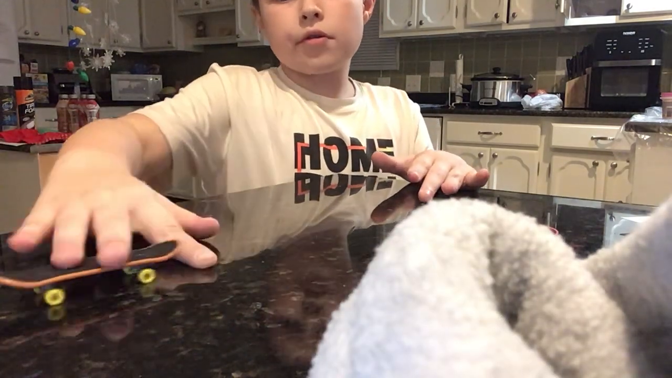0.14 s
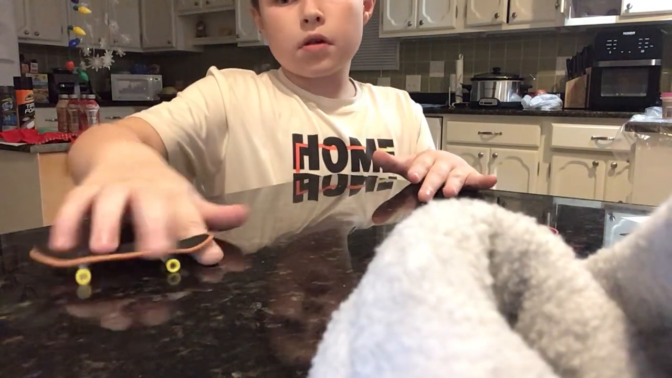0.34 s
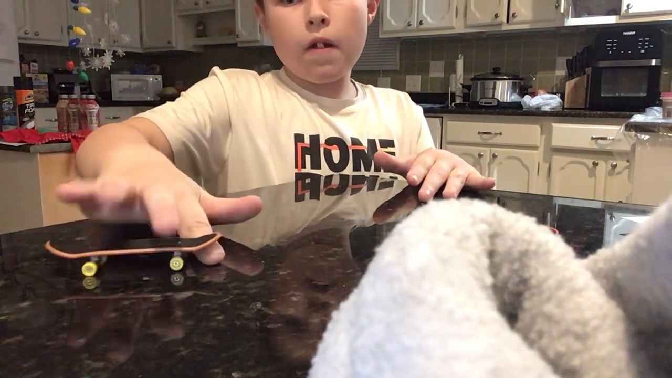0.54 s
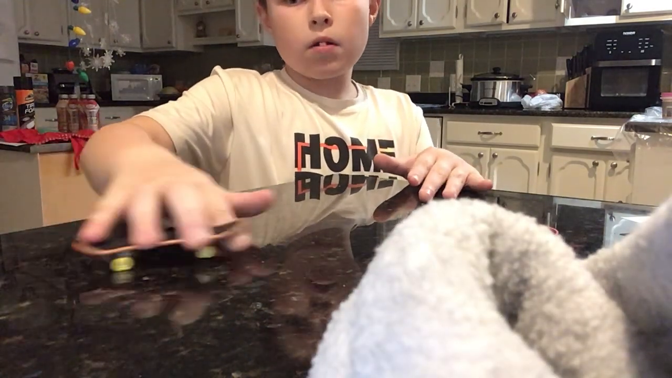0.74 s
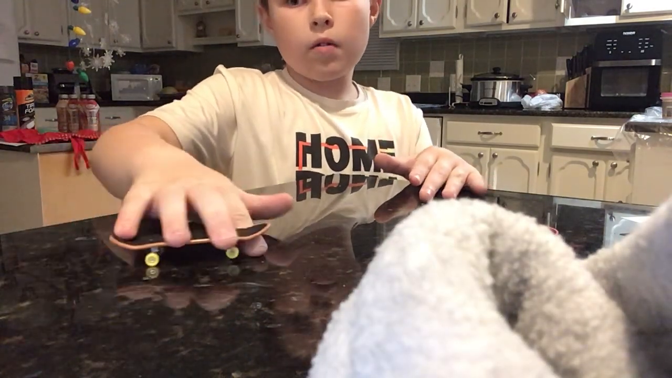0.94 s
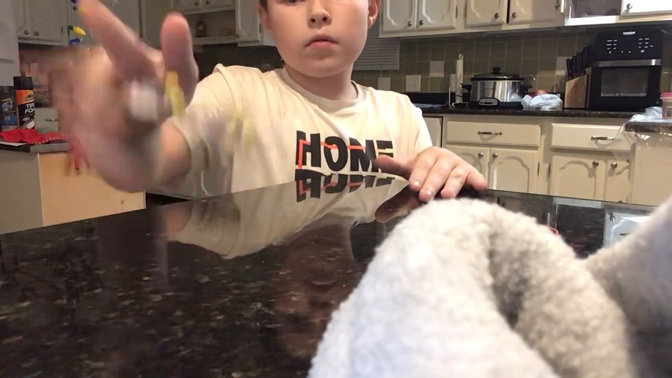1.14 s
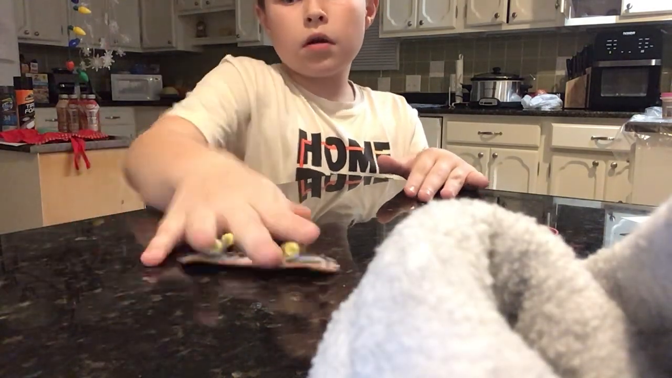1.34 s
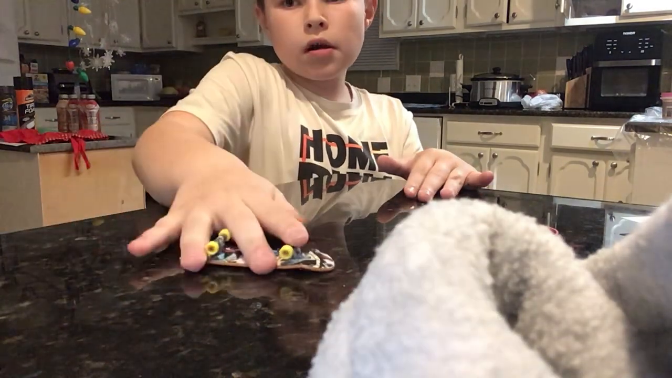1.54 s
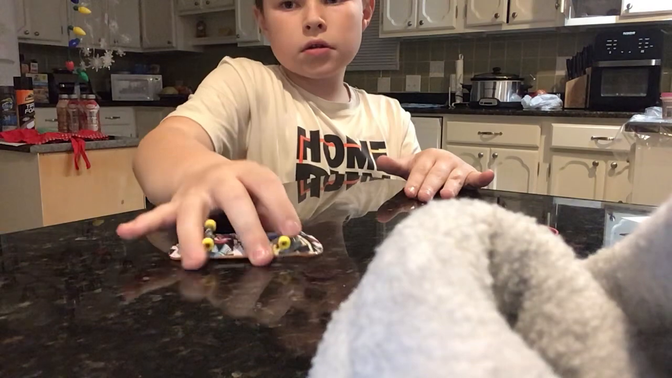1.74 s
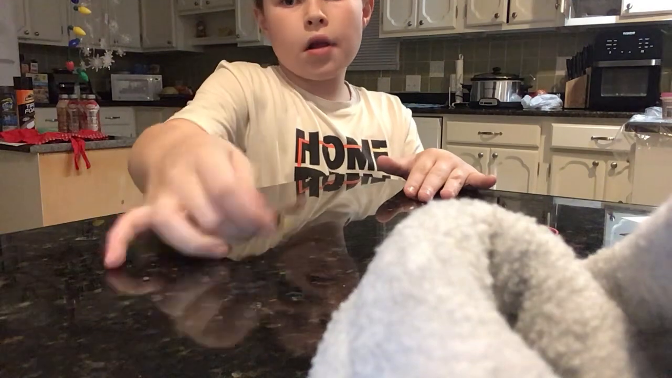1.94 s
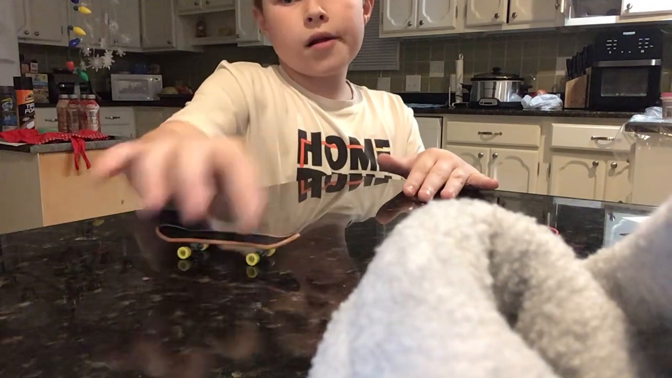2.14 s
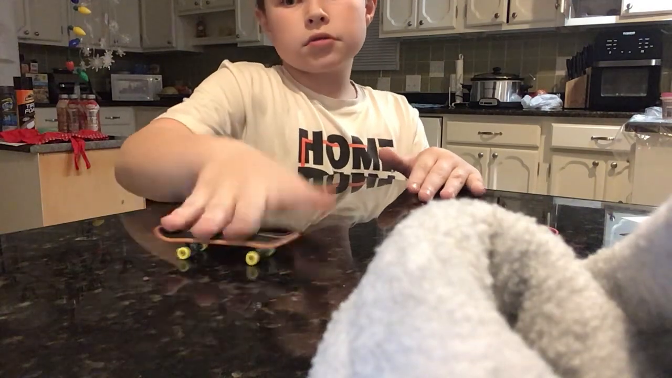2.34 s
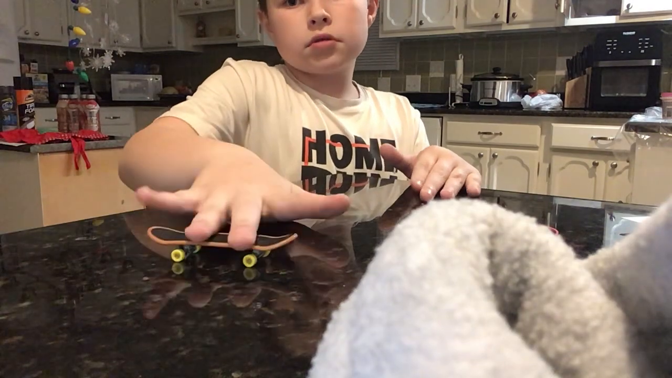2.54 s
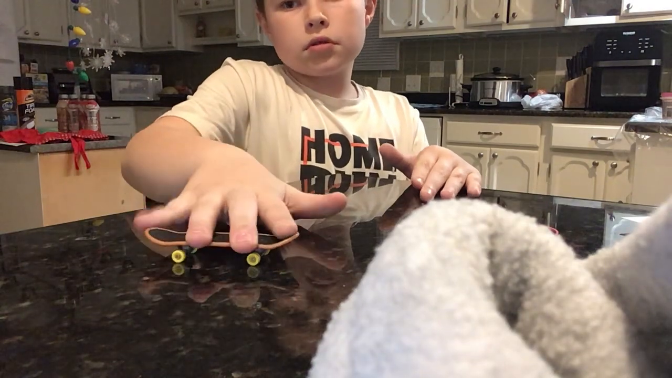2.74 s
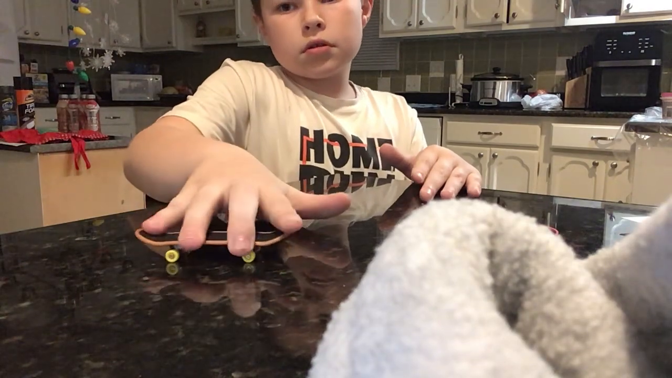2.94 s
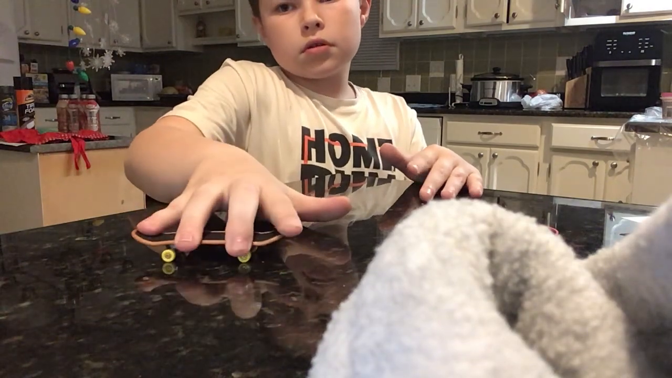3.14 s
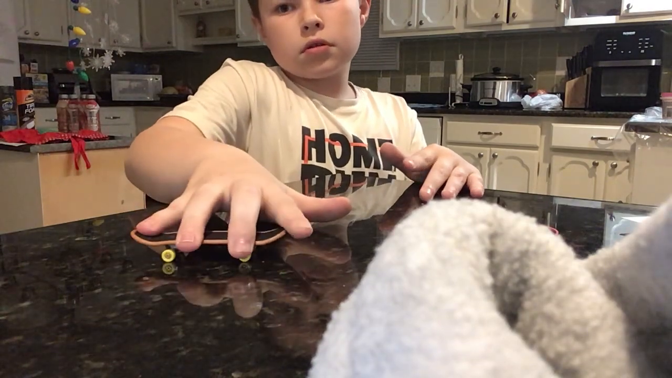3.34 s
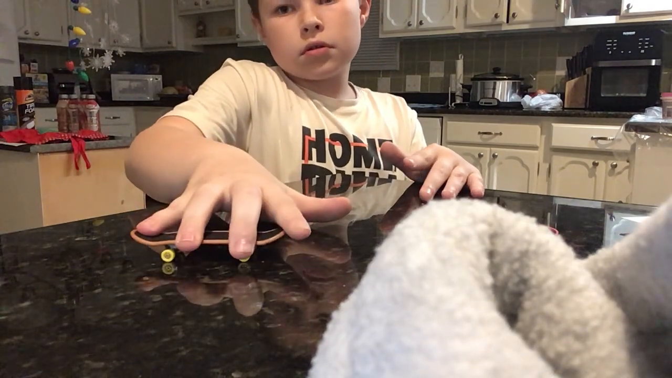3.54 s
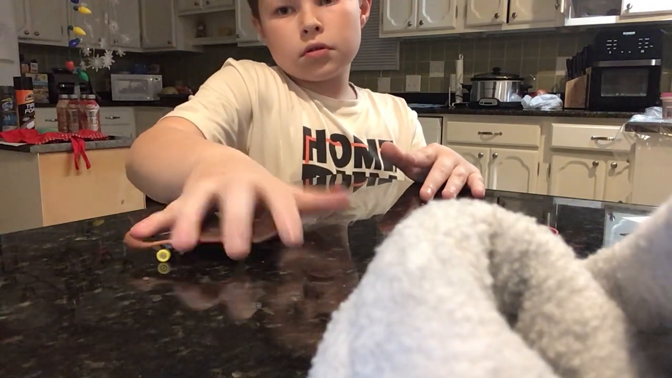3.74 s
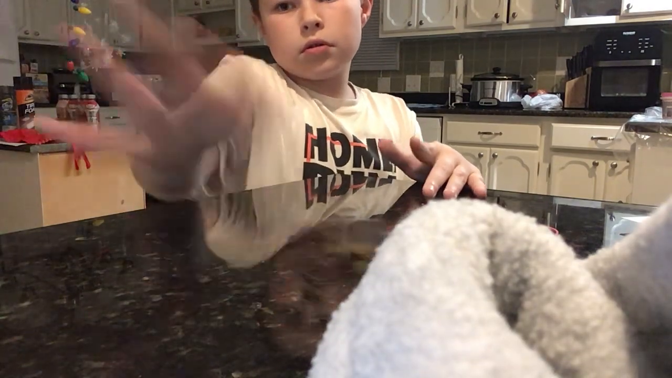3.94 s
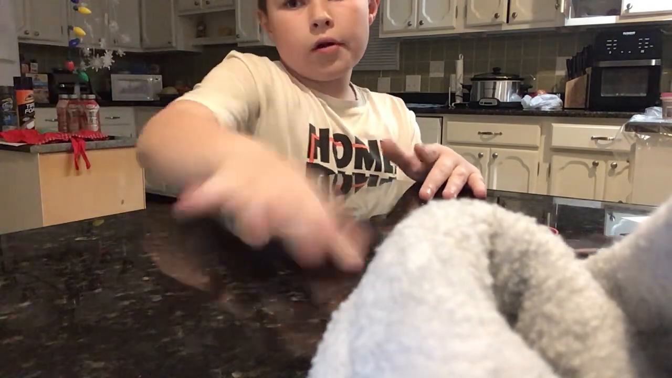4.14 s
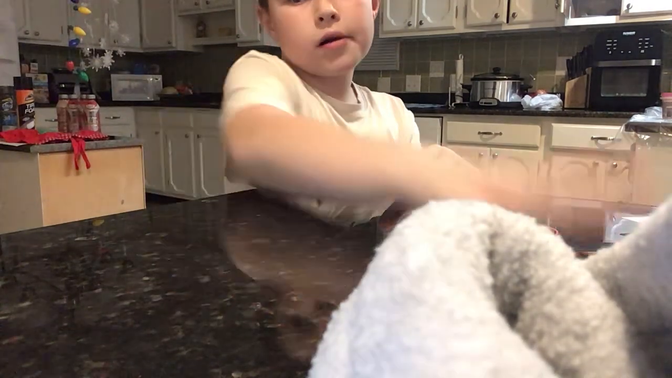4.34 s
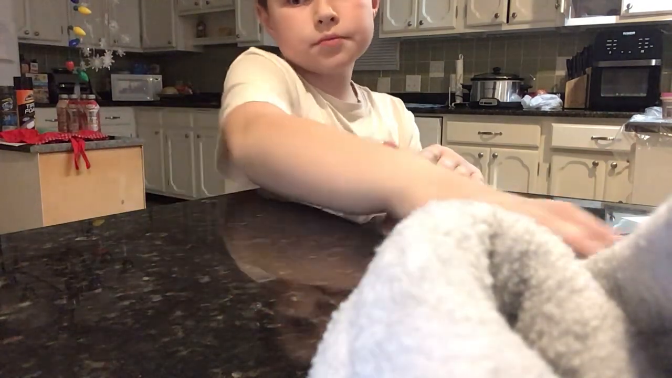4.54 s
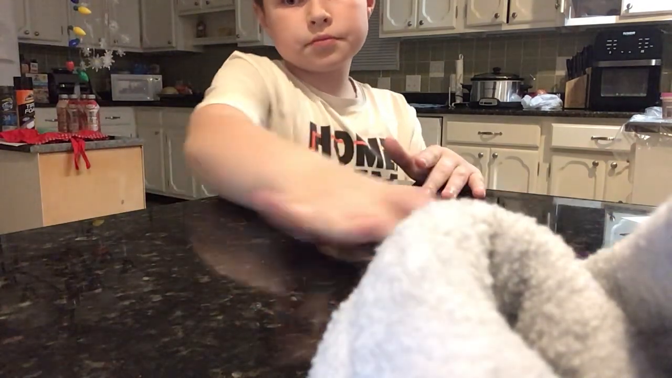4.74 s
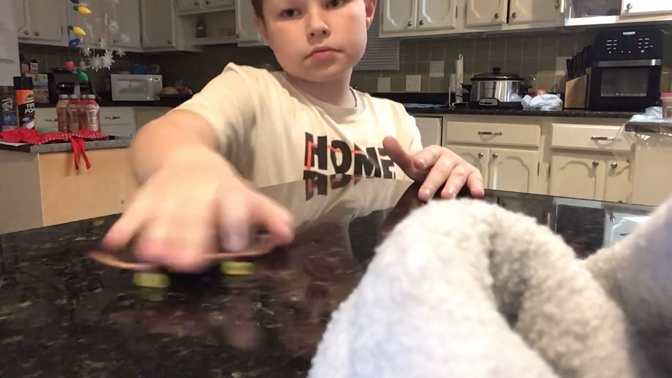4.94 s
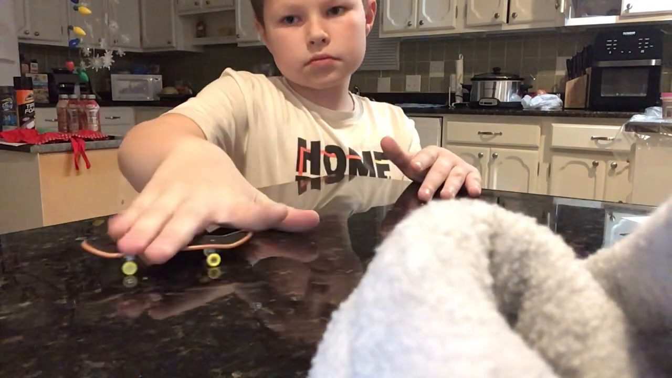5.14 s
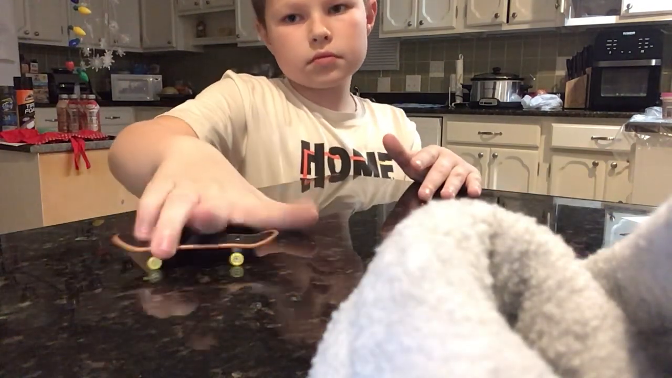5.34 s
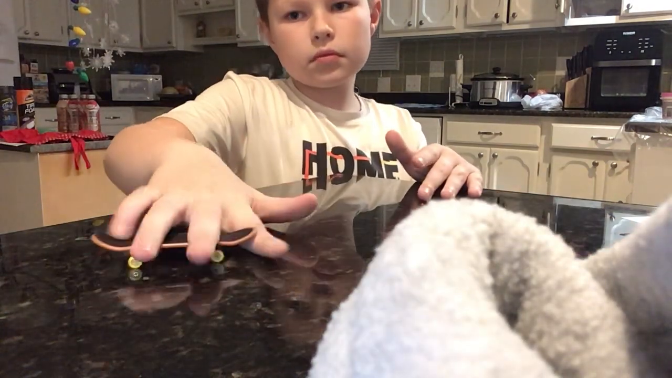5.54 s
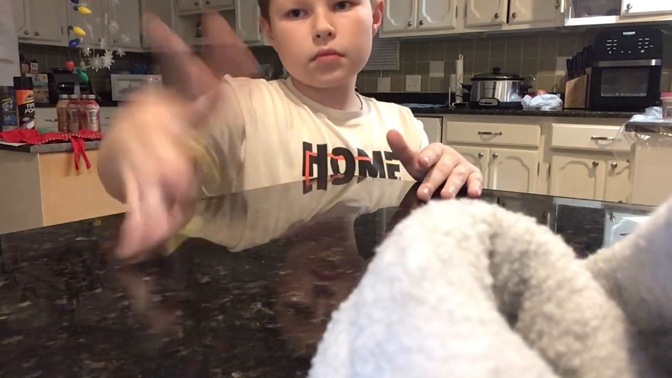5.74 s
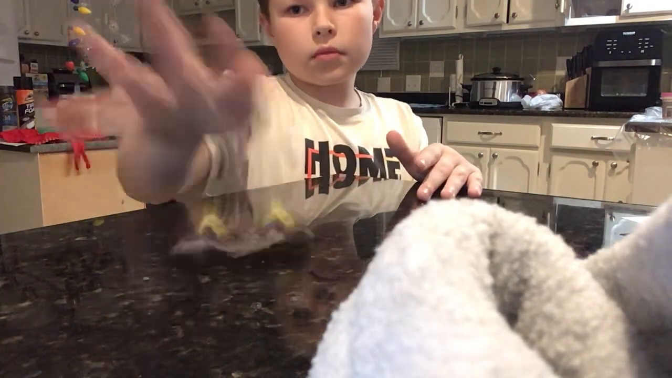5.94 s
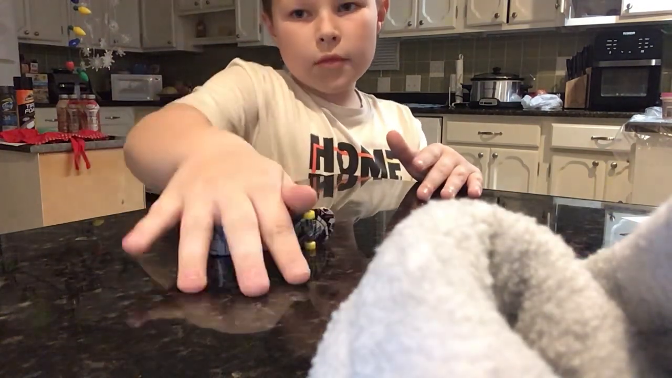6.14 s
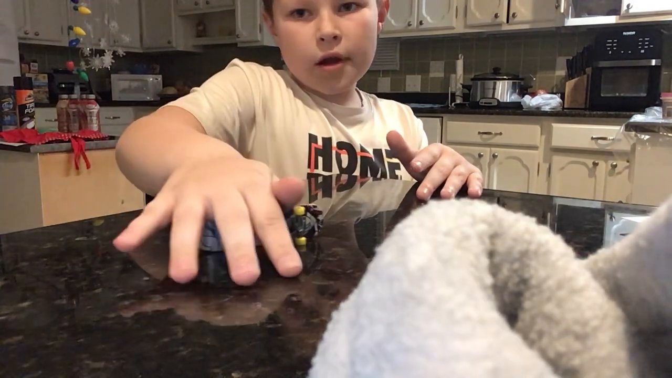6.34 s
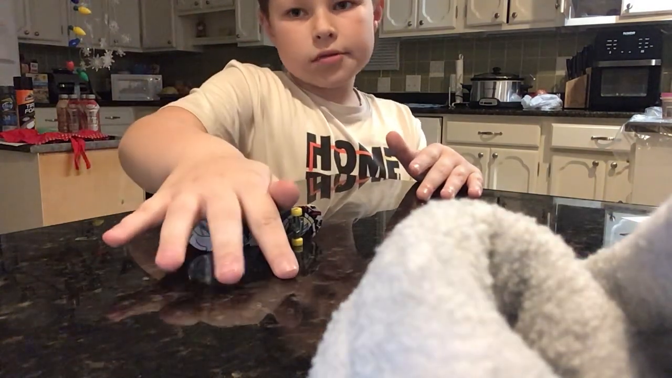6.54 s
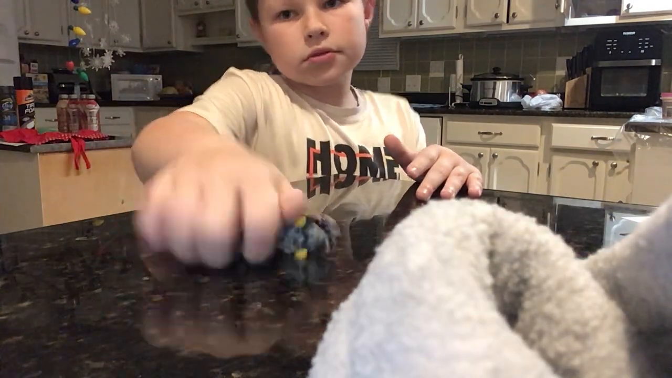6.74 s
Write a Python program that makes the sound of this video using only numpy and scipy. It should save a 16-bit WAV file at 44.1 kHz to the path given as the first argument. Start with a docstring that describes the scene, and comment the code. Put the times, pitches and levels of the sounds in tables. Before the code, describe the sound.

In a reflective kitchen, a toy board ticks and slides on polished stone over a faint low fridge hum. A bright crack with a deep counter knock comes early, then light rattles and a pause. A heavy palm thump and a second slap follow, with the forearm rubbing over the counter, more clicks, a piercing close board drop and a final slap. Finger squeaks and faint taps end it.

```python
"""On a stone kitchen counter, close to the microphone, a toy fingerboard is pushed, popped and dropped.
Bursts of tiny impulses ring deck, trucks and wheels; slaps of a hand are short puffs of filtered noise.
Slab and hollow cabinet are heard as thuds that fall in pitch; slides and squeaks are filtered slips.
The hard kitchen adds an echo and a diffuse tail after every hit, while a refrigerator hums in the room's air."""
import sys
import numpy as np
from scipy import signal
from scipy.fft import rfft, irfft, next_fast_len
from scipy.io import wavfile
from scipy.ndimage import uniform_filter1d, minimum_filter1d

SR = 44100
rng = np.random.default_rng(int(sys.argv[2]) if len(sys.argv) > 2 else 0)


def wrap_up_sound(samples):
    """Save the sound to the file named by the first command line argument, as 16-bit audio."""
    columns = np.atleast_2d(samples).T
    # keep every value between -1 and 1, then stretch to whole-number steps
    tamed = np.clip(columns, -1, 1)
    steps = np.round(tamed * 32767).astype(np.int16)
    wavfile.write(sys.argv[1], SR, steps)


N = 298993
TIME = np.arange(N) / SR


def from_db(db):
    """Decibels to gain."""
    return 10 ** (np.asarray(db) / 20)


def rms_one(x):
    """Scale to an rms of 1."""
    return x / np.sqrt(np.mean(x ** 2) + 1e-20)


def unit_blow(x):
    """Scale to the energy of a hundredth of a second at rms 1."""
    return x / np.sqrt(np.sum(x ** 2) * 100 / SR + 1e-20)


def at_hz(points, hz, axis=1):
    """Read a column of a table on a log-frequency axis."""
    table = np.array(points)
    return np.interp(np.log(np.maximum(hz, 1)), np.log(table[:, 0]), table[:, axis])


def band(x, hz, kind, order=2):
    """Causal Butterworth filter."""
    sections = signal.butter(order, np.minimum(hz, .45 * SR), kind, fs=SR, output="sos")
    return signal.sosfilt(sections, x)


def coloured(x, spectrum):
    """Give a steady sound a spectrum; rms 1."""
    size = next_fast_len(N)
    gain = from_db(at_hz(spectrum, np.fft.rfftfreq(size, 1 / SR)))
    return rms_one(irfft(rfft(x, size) * gain, size)[:N])


def drift(rate):
    """Smooth random wander with an rms of 1, aiming at a new value `rate` times a second."""
    knots = rng.standard_normal(int(N / SR * rate) + 4)
    return rms_one(np.interp(TIME * rate, np.arange(len(knots)), knots))


def add(track, s, sound):
    """Mix a sound into a track at time s."""
    start = int(s * SR)
    track[start:start + len(sound)] += sound[:max(N - start, 0)]


def ring(force, modes, vary_db, detune, size=4096):
    """Modes driven by a force; each blow finds them with other strengths and slightly shifted pitches."""
    force = np.pad(force, (0, size - len(force))) + 1e-18
    out = 0
    for (hz, db, t60), (strength, shift) in zip(modes, rng.standard_normal((len(modes), 2))):
        radius = from_db(-60 / (t60 * SR))
        angle = 2 * np.pi * hz * (1 + detune * shift) / SR
        mode = signal.lfilter([1, 0, -1], [1, -2 * radius * np.cos(angle), radius * radius], force)
        # subtracting the sum so far alternates the signs of the modes
        out = from_db(db + vary_db * strength) * mode - out
    return unit_blow(out)


def chatter(length_s, first=1.8, size=1024):
    """A hard first touch followed by a dying scatter of tiny ones."""
    touches = rng.standard_normal(size) * (rng.random(size) < .3)
    force = touches * np.exp(-np.arange(size) / (SR * length_s))
    force[0] += first
    return force


def sent_around(x, spread_s=.007, count=60):
    """Each contact takes its own paths into the room: every frequency leaves with another small delay."""
    hz = np.fft.rfftfreq(len(x), 1 / SR)
    delay_s = np.interp(hz, np.linspace(0, SR / 2, count), spread_s * rng.random(count))
    phase = 2 * np.pi * np.cumsum(delay_s) * hz[1]
    return irfft(rfft(x) * np.exp(-1j * phase), len(x))


BOARD_ROOM_DB = 0   # how strongly the board radiates into the room
# the drop inside this window lands near the microphone and is drier
CLOSE_FROM_S, CLOSE_UNTIL_S, CLOSE_ROOM_DB = 5.9, 6.02, -11


def room_share():
    """Gain into the room over time: constant but for the close drop."""
    close = (TIME > CLOSE_FROM_S) & (TIME < CLOSE_UNTIL_S)
    return from_db(np.where(close, CLOSE_ROOM_DB, BOARD_ROOM_DB))


# board touching stone or fingers: (time [s], chatter decay [s], deck level [dB], trucks level [dB],
# wheels level [dB], slab thud level [dB]); the thud is played by slab()
BOARD_CONTACTS = [(0.0982, 0.0011, -59.5, -59.5, -50, -55), (0.13, 0.0037, -52, -66, -52.5, -50.5),
                  (0.415, 0.002, -84, -70.5, -63, -67), (0.6196, 0.01, -58.5, -57.5, -48.5, -57),
                  (1.0491, 0.0026, -48.5, -47.5, -38, -51), (1.3054, 0.0014, -62, -66, -47, -82),
                  (1.3129, 0.003, -76, -56, -51, -85), (1.3342, 0.00082, -31.5, -21, -32.5, -51),
                  (1.3362, 0.00035, -34.5, -17, -14, -46), (1.829, 0.0026, -58.5, -59.5, -65, -58),
                  (1.8628, 0.004, -49, -46.5, -43, -50), (1.983, 0.002, -69.5, -62, -65, -77),
                  (2.012, 0.011, -55.5, -46.5, -53.5, -51), (2.0534, 0.007, -52.5, -52, -46.5, -45.5),
                  (2.351, 0.0078, -55.5, -60, -55, -50.5), (2.366, 0.0097, -45.5, -42, -37, -39),
                  (2.903, 0.0022, -69.5, -69, -57.5, -76), (3.8002, 0.0054, -44, -55, -39, -45.5),
                  (3.8798, 0.0042, -55.5, -63, -44.5, -68), (3.931, 0.0034, -39.5, -37, -35, -36),
                  (3.977, 0.0023, -67, -50, -44.5, -84), (4.692, 0.0024, -63, -73, -56.5, -54),
                  (4.744, 0.0013, -75, -61, -50.5, -47), (4.8086, 0.0022, -56.5, -55, -51, -65),
                  (4.895, 0.0034, -61, -51.5, -46, -59), (5.4837, 0.0066, -56, -59, -49, -64.5),
                  (5.683, 0.0011, -62, -68, -47.5, -66.5), (5.7327, 0.0017, -44.5, -46, -35.5, -49.5),
                  (5.9611, 0.00041, -30, -13, -12.5, -38), (5.9625, 0.00049, -29, -21, -10.5, -27.5),
                  (5.9914, 0.002, -31.5, -26, -26.5, -52), (6.67, 0.0018, -59, -64.5, -76.5, -75),
                  (6.753, 0.0013, -51, -51, -57.5, -53)]
# ringing parts of the board: (frequency [Hz], relative level [dB], t60 [s])
DECK_MODES = [(653, 0.5, 0.043), (1012.5, -5, 0.045), (1307, 1.5, 0.039), (1720, -3.5, .025),
              (2200, 1.5, 0.013), (2500, 3.5, 0.018)]
TRUCK_MODES = [(2870, -10.5, 0.033), (3580, -1.5, 0.012), (3995, 4.5, 0.015), (4480, -3, 0.0055),
               (4450, 2, 0.012), (4920, -6, 0.0082), (6090, 0, 0.0077)]
WHEEL_MODES = [(6650, -0.5, 0.0083), (7790, -1.5, 0.0084), (7440, -1, .008), (9335, -4.5, 0.004),
               (9960, -4, 0.016), (10420, 4, 0.0037), (12300, -2.5, 0.0035), (11760, 0, 0.0097),
               (14300, -7, 0.0022), (15130, -4.5, .004)]


def board(crack_db=-4.0, ring_share_db=-8.5, size=4096):
    """Each contact rings deck, trucks and wheels in its own proportion. Returns the sound straight ahead
    and the sound thrown into the room, where the peaks of all directions average out to a broad crack."""
    ahead, around = np.zeros((2, N))
    click = signal.unit_impulse(size)
    parts = [(DECK_MODES, [750, 2750]), (TRUCK_MODES, [2800, 6100]), (WHEEL_MODES, [6500, 12500])]
    # alternating signs let neighbouring bands join without a notch
    cracks = [(-1) ** k * unit_blow(band(click, edges_hz, "band")) for k, (_, edges_hz) in enumerate(parts)]
    for s, decay_s, deck_db, trucks_db, wheels_db, _ in BOARD_CONTACTS:
        force = chatter(decay_s)
        for (modes, edges_hz), crack, db in zip(parts, cracks, (deck_db, trucks_db, wheels_db)):
            rung = ring(force, modes, vary_db=1.5, detune=0.026)
            rung = unit_blow(band(rung, edges_hz, "band", order=1))
            cracked = unit_blow(signal.fftconvolve(force, crack)[:size])
            near = unit_blow(rung + from_db(crack_db) * cracked)
            far = unit_blow(crack + from_db(ring_share_db) * near)
            add(ahead, s, from_db(db) * near)
            add(around, s, from_db(db) * sent_around(far))
    return ahead, around * room_share()


# hand coming down on the counter: (time [s], puff decay [s], smack pitch [Hz], smack level [dB],
# sting level [dB], slab thud level [dB]); the thud is played by slab()
HAND_SLAPS = [(4.0228, 0.0015, 1250, -29.5, -37, -21), (4.3735, 0.0057, 1500, -47, -50, -46),
              (4.3805, 0.0067, 1593, -40, -35, -28), (6.031, 0.0028, 2086, -29.5, -39.5, -31.5)]


def hand(rise_s=0.0027, size=2048):
    """Skin meets stone over a few milliseconds: a hollow smack and a bright sting, with no ring."""
    out, t = np.zeros(N), np.arange(size) / SR
    for s, decay_s, hz, smack_db, sting_db, _ in HAND_SLAPS:
        puff = rng.standard_normal(size) * (1 - np.exp(-t / rise_s)) * np.exp(-t / decay_s)
        smack = band(puff, [hz / 1.83, hz * 1.68], "band")
        sting = band(band(puff, [2200, 7500], "band", order=1), 13600, "low")
        add(out, s, from_db(smack_db) * unit_blow(smack))
        add(out, s, from_db(sting_db) * unit_blow(sting))
    return out


# stone slab of the counter: (frequency [Hz], relative level [dB], t60 [s])
SLAB_MODES = [(231, -13.5, .05), (305, 0.5, 0.0074), (700, -6, 0.02)]


def slab():
    """Every board contact and hand slap knocks the slab's own short modes."""
    out = np.zeros(N)
    for row in BOARD_CONTACTS + HAND_SLAPS:
        s, thud_db = row[0], row[-1]
        thud = ring(np.ones(1), SLAB_MODES, vary_db=3.0, detune=0.018)
        add(out, s, from_db(thud_db) * unit_blow(band(thud, [170, 400], "band")))
    return out


# blows that shake the whole counter: (time [s], level [dB])
COUNTER_BOOMS = [(0.1176, -44), (1.331, -21), (1.8614, -51), (2.367, -47), (3.798, -47), (4.016, -16),
                 (4.38, -26.5), (5.105, -43), (6.026, -22.5)]
# hollow cabinet under the slab: (frequency [Hz], relative level [dB], t60 [s])
CABINET_MODES = [(76, 1.5, 0.17), (108.5, -11.5, .14), (166, -23, 0.026)]


def cabinet(swell_s=0.028, scatter_db=-8.0):
    """A heavy blow scatters in the slab at once, and the hollow cabinet below swells after it."""
    out, t = np.zeros(N), np.arange(8192) / SR
    for s, db in COUNTER_BOOMS:
        push = ring(np.ones(1), CABINET_MODES, vary_db=3.5, detune=0.01, size=16384)
        add(out, s + swell_s, from_db(db) * unit_blow(band(push, [55, 200], "band")))
        # waves thrown back from the edges of the slab make the knock uneven
        rebounds = rng.standard_normal(len(t)) * t * np.exp(-t / 0.019)
        add(out, s, from_db(db + scatter_db) * unit_blow(band(rebounds, [55, 260], "band")))
    return out


def counter(lag_s=.0062, corner_hz=330):
    """Slab and cabinet together; the lowest frequencies arrive a few milliseconds late, so each thud
    falls in pitch."""
    size = next_fast_len(N + SR)
    hz = np.fft.rfftfreq(size, 1 / SR)
    # delay of lag_s at the bottom, shrinking above the corner
    phase = lag_s * 2 * np.pi * corner_hz * np.arctan(hz / corner_hz)
    return irfft(rfft(slab() + cabinet(), size) * np.exp(-1j * phase), size)[:N]


def swell(s, length_s, attack_s, release_s):
    """Envelope that builds up to time s, holds for its length and dies away."""
    before, after = np.maximum(s - TIME, 0), np.maximum(TIME - s - length_s, 0)
    return np.exp(-(before / attack_s) ** 2 - after / release_s)


# pushes of the board or the arm across the stone: (time [s], length [s], rub level [dB],
# rasp level [dB], hiss level [dB]); levels come before the slide trim
SLIDE_STROKES = [(0.09, 0.054, -69, -66, -68), (0.284, 0.078, -75, -78, -69.5), (0.687, .14, -71, -74, -74),
                 (1.725, 0.13, -68, -63, -69), (2.398, 0.033, -74, -58.5, -71),
                 (3.86, 0.16, -55.5, -54, -56), (4.602, 0.14, -53.5, -67, -84),
                 (4.833, .11, -60, -57.5, -62), (5.028, 0.058, -79.5, -89, -64.5),
                 (5.336, .02, -76.5, -84.5, -68), (6.703, .09, -60, -64.5, -66.5)]
# friction colours, dark to bright: (frequency [Hz], relative level per Hz [dB])
RUB_COLOUR = [(450, -7.5), (650, 2), (870, -2), (1300, 0.5), (1850, -11), (2250, -2.5), (2600, -7),
              (3200, -21.5)]
RASP_COLOUR = [(2200, -20), (3100, 1), (3700, 1.5), (4450, 5), (5400, -13), (6500, -32), (9000, -29)]
HISS_COLOUR = [(4000, -34), (6000, -46), (7700, 3), (8800, -2), (10600, 6.5), (12500, 0), (14000, -8.5),
               (16000, -24)]
STROKE_ATTACK_S, STROKE_RELEASE_S = 0.052, 0.066   # time constants of the hand's speed
GRIT_PER_S, GRIT_DB = 69, 18   # crumbs caught under a stroke; level added, relative to a slip


def sliding(grain_db=3.5, uneven_db=3.0, slide_db=-2.5):
    """Friction is a dense stream of small slips under an uneven pressure, with a crumb of grit now and then."""
    grit = from_db(GRIT_DB) * (rng.random(N) < GRIT_PER_S / SR)
    pressure = from_db(grain_db * drift(700) + uneven_db * drift(46))
    slips = rng.standard_normal(N) * (1 + grit) * pressure
    textures = np.array([coloured(slips, colour) for colour in (RUB_COLOUR, RASP_COLOUR, HISS_COLOUR)])
    friction = np.zeros(N)
    for s, length_s, *levels_db in SLIDE_STROKES:
        envelope = swell(s, length_s, STROKE_ATTACK_S, STROKE_RELEASE_S)
        friction += envelope * (from_db(levels_db) @ textures)
    return from_db(slide_db) * friction


# the forearm judders as it is dragged back: (time [s], length [s], level [dB])
ARM_JUDDERS = [(4.888, 0.097, -40.5), (5.153, 0.017, -52)]
# low rumble of the judder: (frequency [Hz], relative level per Hz [dB])
JUDDER_SPECTRUM = [(29, -39.5), (50, -22), (75, -2.5), (130, 0.5), (204, -8.5), (236, -10.5), (441, -24.5),
                   (476, -45), (500, -17), (650, -43), (1100, -120)]
# attack as a share of the length: a longer drag takes longer to build up
JUDDER_ATTACK_SHARE, JUDDER_RELEASE_S = 0.87, 0.03


def arm_judder():
    """The dragged forearm sounds as low coloured noise that swells and dies away."""
    drag = np.zeros(N)
    for s, length_s, db in ARM_JUDDERS:
        drag += from_db(db) * swell(s, length_s, JUDDER_ATTACK_SHARE * length_s, JUDDER_RELEASE_S)
    return drag * coloured(rng.standard_normal(N), JUDDER_SPECTRUM)


# fingertips sticking and slipping on polished stone and deck:
# (time [s], length [s], pitch [Hz], level [dB])
FINGER_SQUEAKS = [(0.212, 0.051, 1400, -63.5), (0.342, 0.048, 2120, -73), (0.822, 0.029, 4070, -68),
                  (1.32, 0.03, 2970, -45), (1.83, 0.013, 1960, -56.5), (4.638, 0.15, 2266, -58),
                  (6.259, 0.01, 1922, -51), (6.29, .01, 1940, -50), (6.407, 0.0073, 3670, -52),
                  (6.679, 0.094, 4700, -63), (6.744, 0.056, 2280, -50.5), (6.743, 0.045, 4470, -51.5)]


def squeaks(width=0.022, settle_cycles=0.46):
    """Stick and slip excites one rough resonance that swells and fades; the longer, the narrower."""
    out = np.zeros(N)
    noises = rng.standard_normal((len(FINGER_SQUEAKS), SR // 4))
    for (s, length_s, hz, db), slips in zip(FINGER_SQUEAKS, noises):
        window = signal.windows.tukey(max(int(length_s * SR), 8), .7)
        spread = 1 + width + settle_cycles / (length_s * hz)
        tone = band(slips, [hz / spread, hz * spread], "band", order=1)[-len(window):]
        add(out, s, from_db(db) * rms_one(tone * window))
    return out


# kitchen reverberation: (frequency [Hz], level before the wet trim [dB], t60 [s])
KITCHEN_TAIL = [(58.7, -14, 0.64), (150, -3.5, 0.72), (294.2, -7.5, 0.65), (700, -7, 0.61),
                (1487, -6, 0.44), (3240, -6.5, 0.66), (5200, -7, 0.61), (8000, -4.5, .52),
                (12000, -6.5, 0.33), (16000, -11, 0.55)]


def kitchen(direct, thrown, echo_s=0.0084, echo_db=-12.0, build_s=0.011, wet_db=-1.5):
    """One clear ceiling echo, then a diffuse tail with its own level and decay in each band."""
    t, edges = np.arange(SR) / SR, np.geomspace(45, 18000, 18)
    white, response = rng.standard_normal((2, SR)), np.zeros(SR)
    for k, (low, high) in enumerate(zip(edges, edges[1:])):
        hz = np.sqrt(low * high)
        build_up = 1 - np.exp(-(t / build_s) ** 2)
        decay = from_db(-60 * t / at_hz(KITCHEN_TAIL, hz, axis=2)) * build_up
        # neighbouring bands use different noise
        tail = band(white[k % 2], [low, high], "band") * decay / np.linalg.norm(decay)
        response += from_db(wet_db + at_hz(KITCHEN_TAIL, hz)) * tail
    delayed = TIME - round(echo_s * SR) / SR
    echo = from_db(echo_db) * np.interp(delayed, TIME, direct * room_share())
    return direct + echo + signal.fftconvolve(thrown, response)[:N]


# refrigerator tones: (frequency [Hz], mean rms level [dB])
FRIDGE_TONES = [(75.4, -65.5), (119, -71), (184.8, -58.5), (323, -70.5), (371.4, -72), (737.5, -79.5)]


def refrigerator(waver_db=1.63, waver_phase=0.56):
    """Steady tones that waver slightly in level and phase (radians)."""
    hum = np.zeros(N)
    for hz, db in FRIDGE_TONES:
        level = from_db(db + waver_db * drift(5.8))
        hum += level * np.sin(2 * np.pi * hz * TIME + waver_phase * drift(3.7))
    return np.sqrt(2) * hum


# the room's air: (frequency [Hz], relative level per Hz [dB])
AIR_COLOUR = [(18, -83), (30, -50.5), (64, -9.5), (124, -14), (149, -26), (165, -7), (189, -7), (215, -16),
              (345, -18), (374, -12), (461, -20.5), (740, -26.5), (866, -31.5), (12000, -42), (16000, -49)]


def room_air(air_db=-59.5):
    """The room's air is a steady coloured noise, strongest in the bass."""
    return from_db(air_db) * coloured(rng.standard_normal(N), AIR_COLOUR)


def scene(palm_room_db=-3.5, rub_room_db=-2.0):
    """All sources in the kitchen, the same in both channels; the hand shields what it strikes or rubs."""
    ahead, around = board()
    blows = hand() + counter()
    rubs = sliding() + arm_judder() + squeaks()
    direct = ahead + blows + rubs
    thrown = around + from_db(palm_room_db) * blows + from_db(rub_room_db) * rubs
    mono = kitchen(direct, thrown) + refrigerator() + room_air()
    return np.array([mono, mono])


def limiter(x, ceiling_db=-2.0, release_db_per_s=220):
    """The gain ducks at once under a loud peak and then climbs back at a steady rate in dB."""
    over = np.maximum(20 * np.log10(np.abs(x).max(axis=0) + 1e-9) - ceiling_db, 0)
    ramp = release_db_per_s * TIME
    held = np.maximum.accumulate(over + ramp) - ramp
    # smooth over about a millisecond
    return x * from_db(uniform_filter1d(minimum_filter1d(-held, size=45), size=45))


def record(dry, cutoff_hz=16200):
    """Bass roll-off, limiter and a steep top cut."""
    limited = limiter(band(dry, 52, "high", order=6))
    top_cut = signal.ellip(10, .1, 90, cutoff_hz, fs=SR, output="sos")
    return signal.sosfilt(top_cut, limited)


dry = scene()
out = record(dry)
wrap_up_sound(out)
```